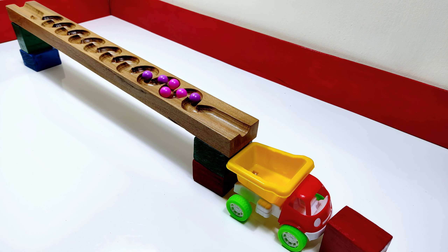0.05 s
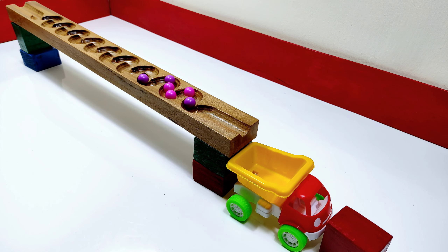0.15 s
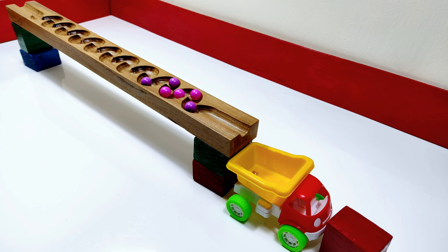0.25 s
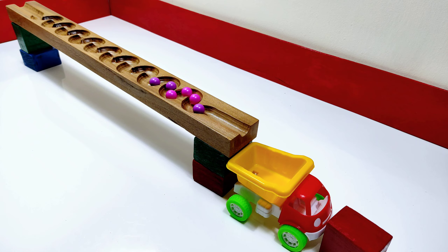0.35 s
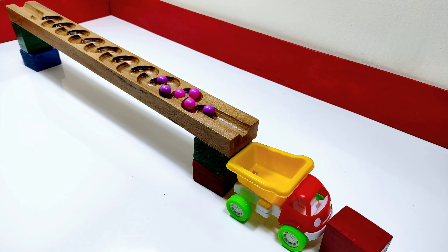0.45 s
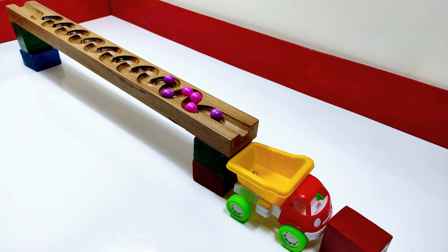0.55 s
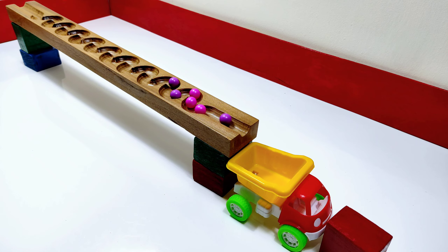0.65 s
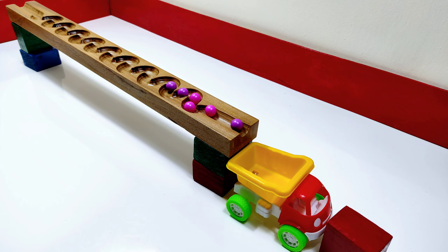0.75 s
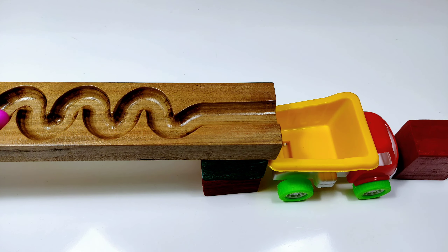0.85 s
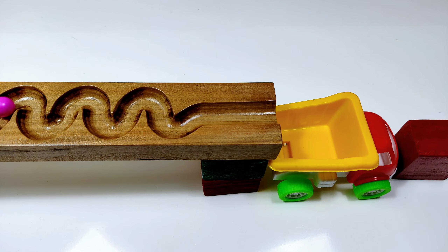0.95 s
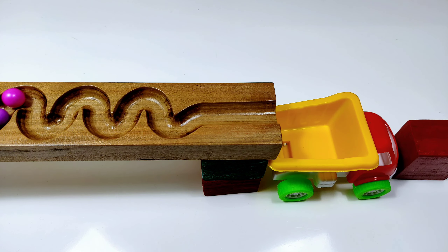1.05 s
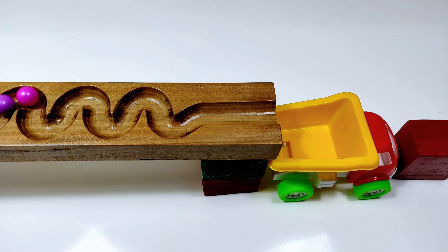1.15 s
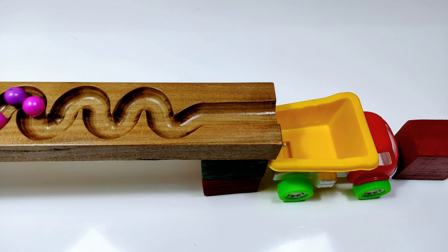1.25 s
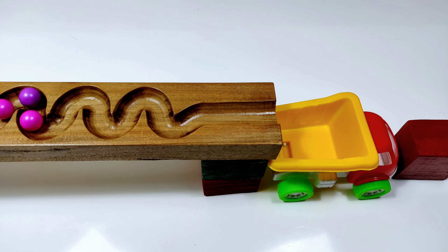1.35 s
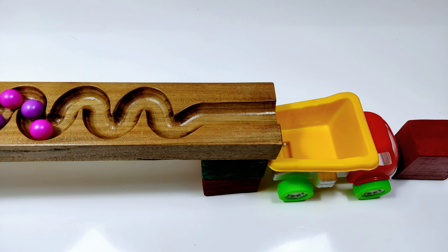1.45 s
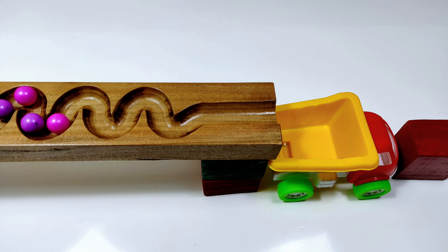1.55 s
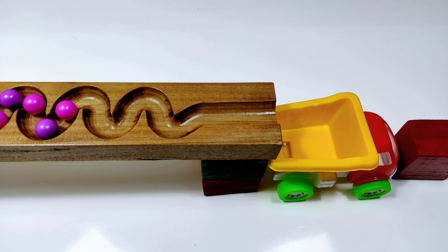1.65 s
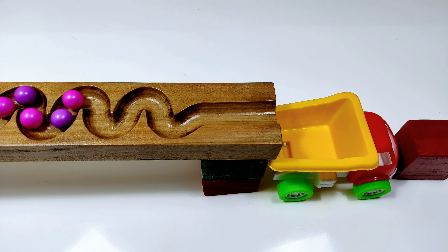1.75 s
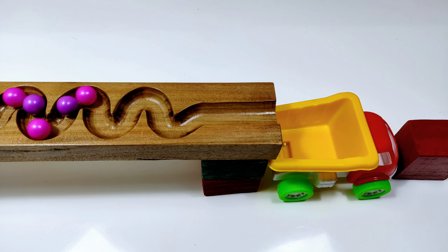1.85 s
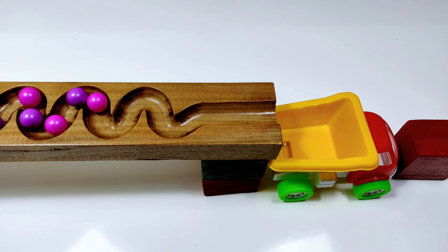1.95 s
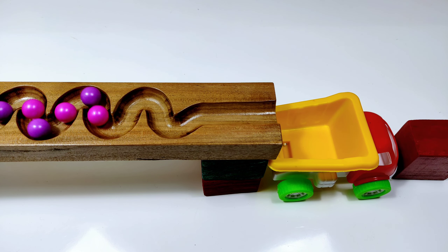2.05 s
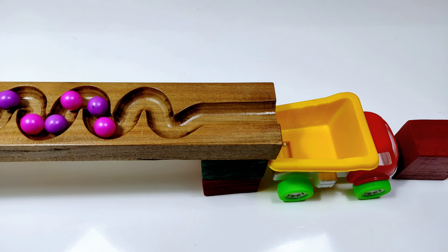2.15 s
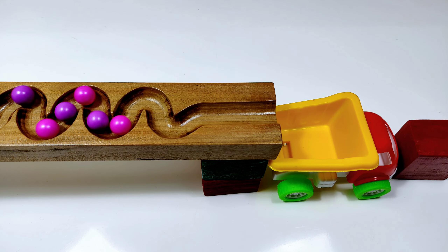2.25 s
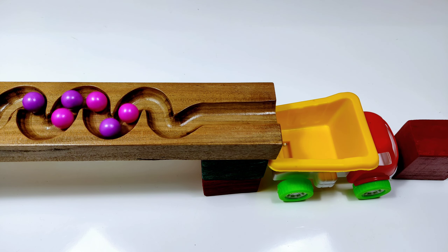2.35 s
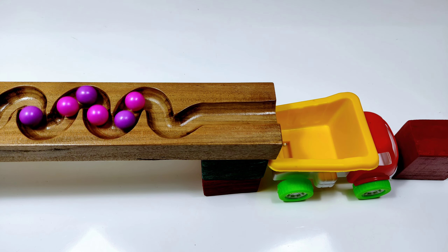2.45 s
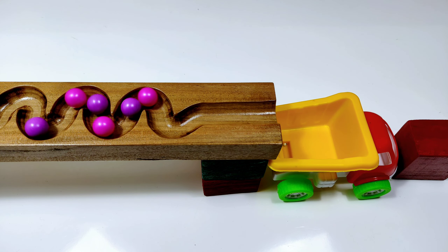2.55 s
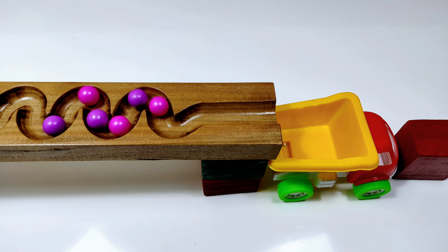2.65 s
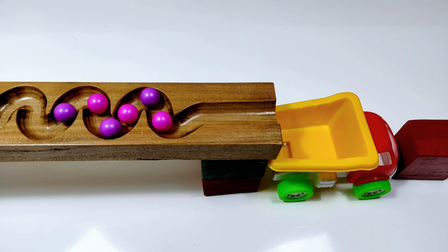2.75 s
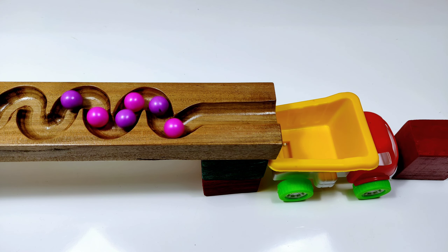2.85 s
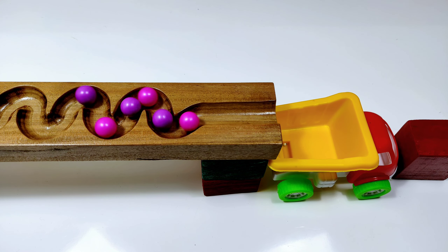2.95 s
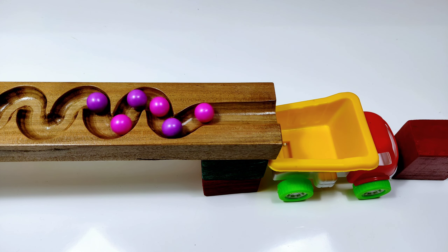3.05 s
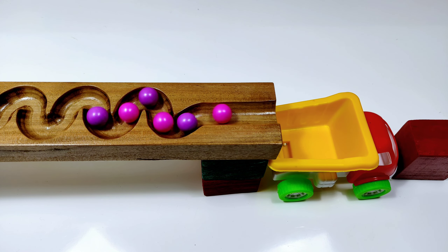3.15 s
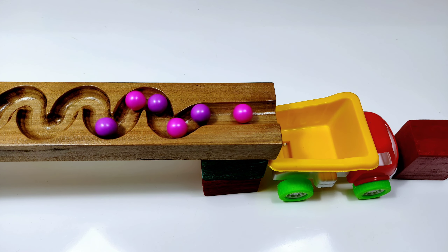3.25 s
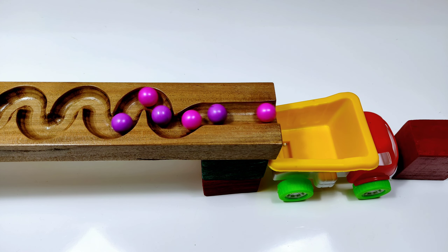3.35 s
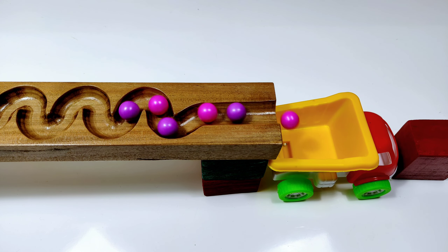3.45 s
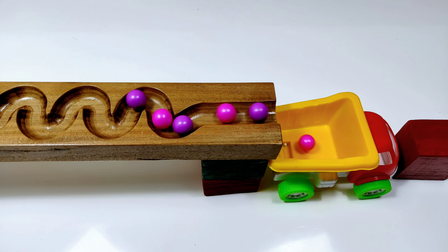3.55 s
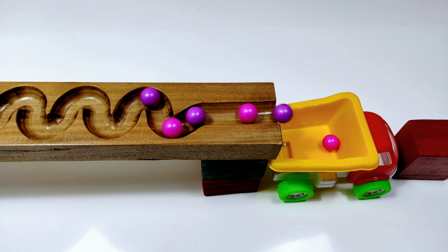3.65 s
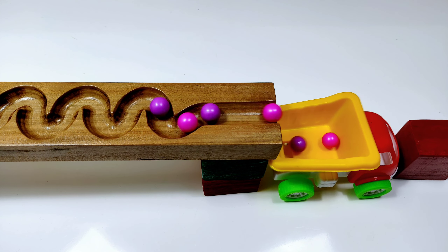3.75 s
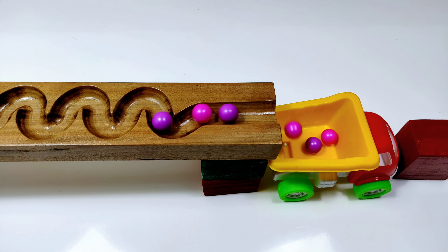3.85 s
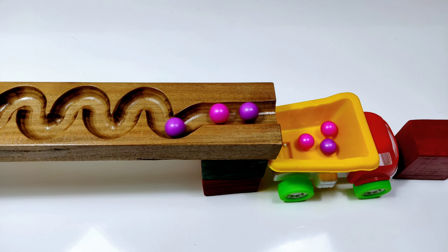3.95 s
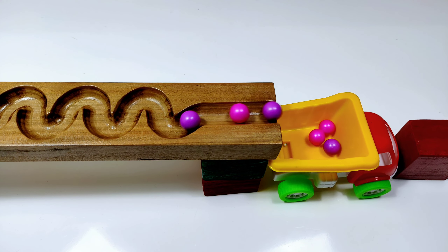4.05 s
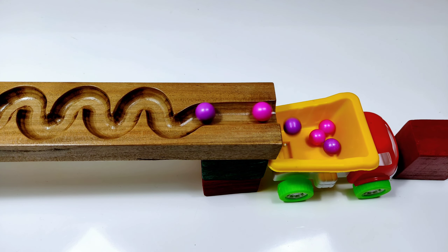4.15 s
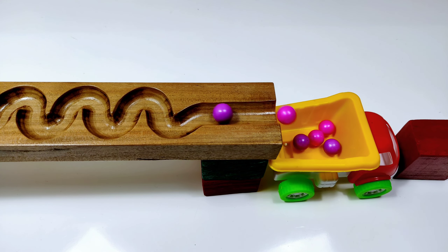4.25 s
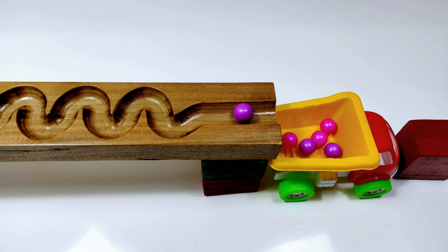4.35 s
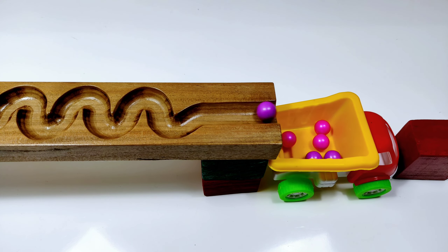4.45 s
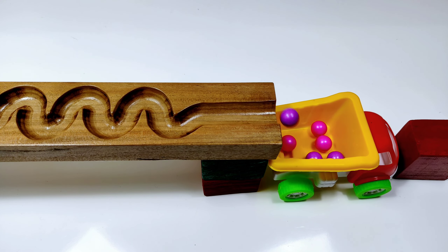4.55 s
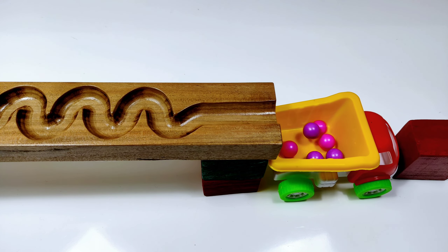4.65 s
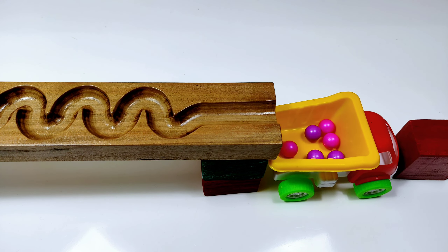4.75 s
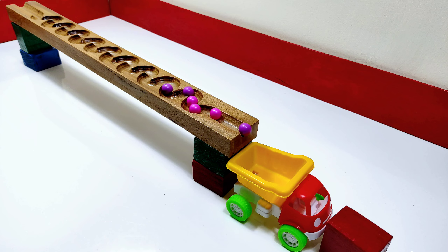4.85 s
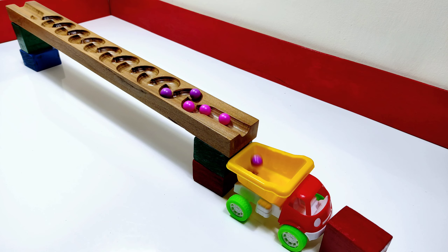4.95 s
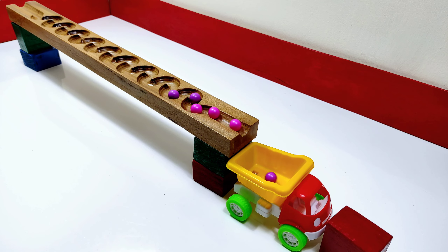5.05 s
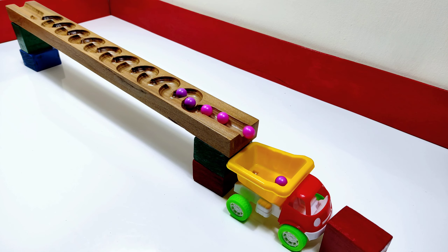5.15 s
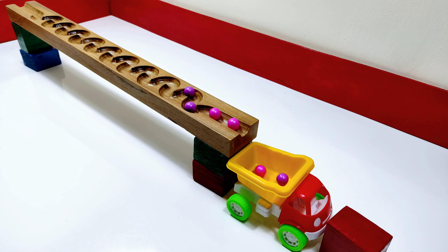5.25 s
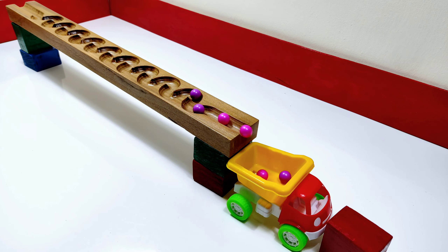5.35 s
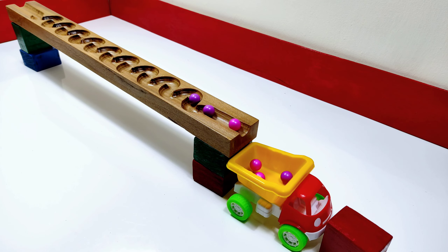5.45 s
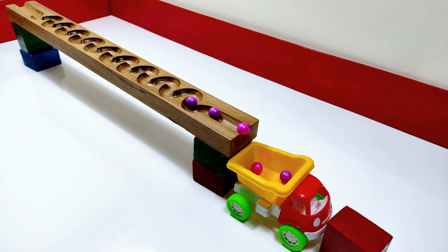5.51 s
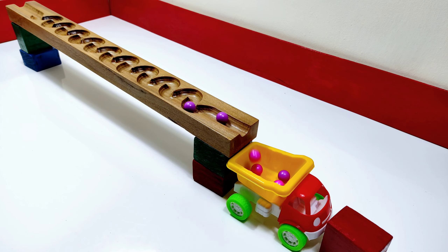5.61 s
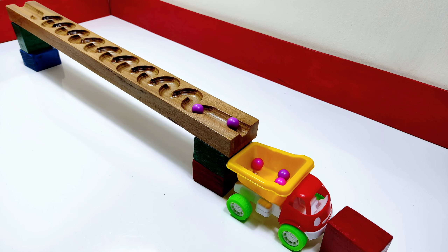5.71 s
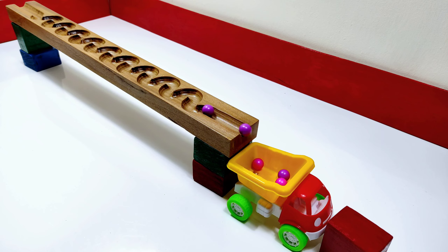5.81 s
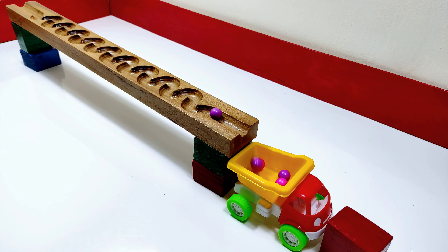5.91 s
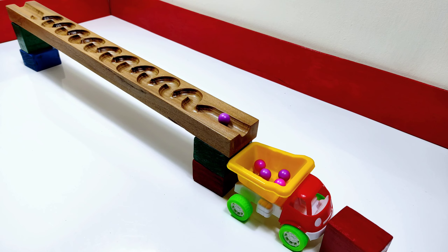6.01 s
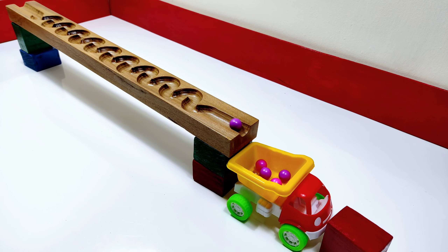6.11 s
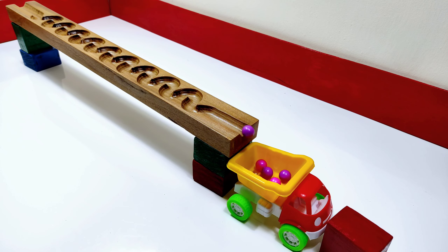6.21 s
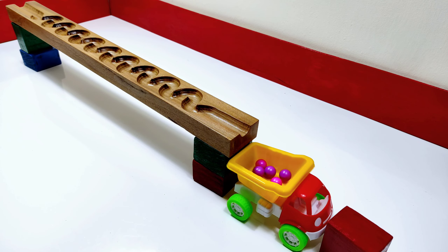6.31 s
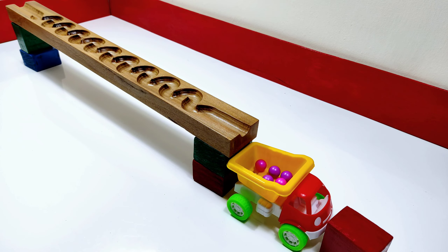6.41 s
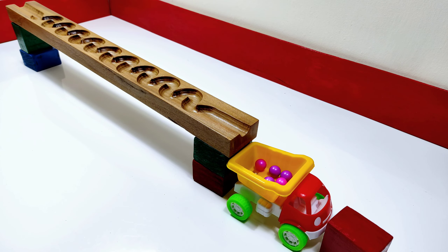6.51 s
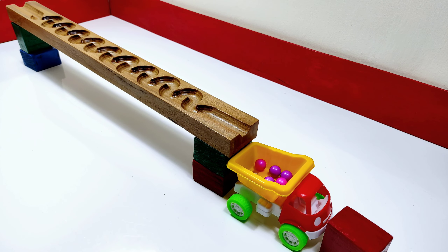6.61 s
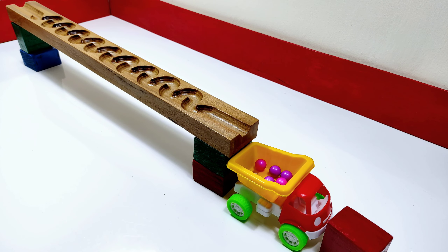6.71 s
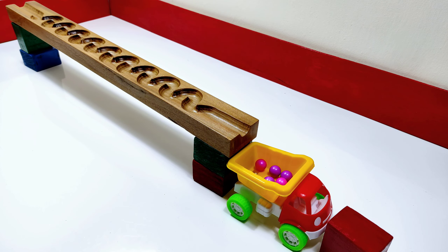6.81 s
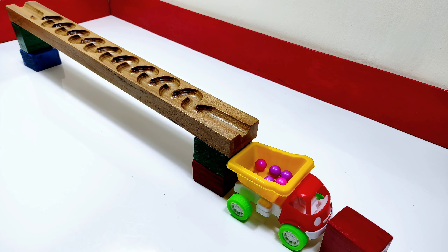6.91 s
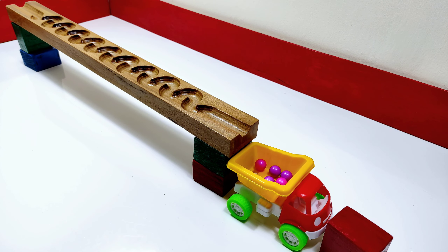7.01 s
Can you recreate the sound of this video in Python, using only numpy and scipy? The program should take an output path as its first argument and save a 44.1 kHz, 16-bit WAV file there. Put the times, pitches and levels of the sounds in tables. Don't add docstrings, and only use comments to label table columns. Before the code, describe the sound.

Glass marbles rumble softly along a wooden track with faint knocks, then crack loudly one after another into a hollow plastic toy truck bed.

```python
import sys
import numpy as np
from scipy import signal
from scipy.fft import rfft, irfft
from scipy.io import wavfile
from scipy.ndimage import uniform_filter1d

SR = 44100
rng = np.random.default_rng(int(sys.argv[2]) if len(sys.argv) > 2 else 0)


def boost_factor(decibels):
    exponent = np.asarray(decibels, float) / 20
    return 10 ** exponent


def to_wav(sig):
    pcm = np.clip(np.atleast_2d(sig), -1, 1) * 32767
    pcm = np.round(pcm).astype(np.int16)
    wavfile.write(sys.argv[1], SR, pcm.T)


N = 312007
TIME = np.arange(N) / SR
BAND_EDGES_HZ = 40 * 2 ** np.arange(0, 9, .5)

# [t/s, level/dB, bounce after/s, bounce loss/dB, bed thump against bounce/dB]
LANDINGS = [(3.536, -11.5, 0.057, 13.5, 9.5), (3.768, -9, 0.046, 22, -16), (3.91, -9.5, 0.045, 23, -3),
            (4.212, -9, 0.059, 20, 6), (4.339, -10, 0.057, 2, 0.5), (4.62, -13, 0.044, 14, 4.5),
            (4.994, -11.5, 0.046, 14.5, -3), (5.267, -9.5, 0.055, 13.5, 4), (5.468, -10, .031, 3, 7.5),
            (5.656, -10, 0.042, 11.5, 6.5), (5.957, -8.5, 0.044, 17.5, 15), (6.337, -5.5, 0.059, 14, 9.5)]
# [t/s, glass level/dB, bed against glass/dB]
JOSTLES = [(2.412, -50, -15), (2.587, -55.5, -25), (2.955, -56.5, -11), (3.628, -35, 8), (3.644, -47, 16.5),
           (3.679, -37, 17), (3.708, -36.5, -6), (3.857, -34.5, 14), (3.876, -44, 12), (3.966, -31.5, 16),
           (3.990, -21, 9.5), (4.035, -41.5, 18.5), (4.066, -33.5, -31), (4.262, -30, 15), (4.307, -34, 9),
           (4.361, -16, 0.5), (4.384, -25, 13), (4.434, -23, 11.5), (4.462, -25.5, 8), (4.505, -47, 20.5),
           (4.559, -37, 12.5), (4.568, -53.5, 15), (4.668, -22.5, -0.5), (4.701, -29, 7.5),
           (4.712, -21.5, 9), (4.748, -26.5, 10), (5.143, -37.5, 10), (5.168, -44, 11.5), (5.572, -32, 13),
           (5.666, -34, 14), (5.716, -31, 12), (5.734, -32.5, 13), (5.76, -54.5, 15.5), (5.814, -36, 9),
           (5.838, -36, 2.5), (6.024, -22, 3.5), (6.812, -64, 8.5), (4.05, -48, 15), (4.073, -37.5, 5.5),
           (4.638, -31, 9), (4.756, -27, 7.5), (4.779, -38.5, 5), (5.074, -43, 9.5), (5.354, -33.5, 9),
           (5.387, -43, 11.5), (5.597, -42.5, 9.5), (5.869, -48.5, 9.5), (6.030, -32, 12),
           (6.054, -32.5, 5), (6.239, -65.5, 3)]
# [f/Hz, level/dB, t60/s]
BED = [(104.7, -5, 0.21), (170.7, -2.5, 0.27), (213.6, -16.5, 0.47), (249, -2, 0.042), (331, -6, 0.033),
       (520, -14.5, 0.031), (636, -27.5, 0.48), (1005, 0, 0.035), (1070, 5, 0.019), (1358, 2, 0.0098),
       (1197, -5, 0.02), (1300, 16, 0.0031), (1433, 3.5, 0.0043), (1610, -2.5, 0.0046)]
# [f/Hz, level/dB, t60/s]
WALLS = [(2110, 18, 0.0033), (2276, -6.5, 0.079), (2632, -1, 0.014), (2640, 2, 0.0086), (3850, 1, 0.017),
         (4320, -24, 0.0037)]
# [f/Hz, level/dB, t60/s]
GLASS = [(4700, -8, .003), (5300, -4, .003), (5900, -3, .003), (6900, -5, .003), (7600, -1, .004),
         (8400, -1, .004), (9200, -4, .003), (11500, -11, .0015), (13000, -15, .0015), (14500, -21, .0015)]
SPOTS = [(3.5, 1.5, -1.5, 7.5, -11), (-0.5, 0, -2.5, 4.5, -4), (0, 2, -3, 5, 3),
         (-4.5, -0.5, -10.5, 7.5, -14.5), (1.5, 6.5, -0.5, 1, -3), (10.5, 1, -4, 3, 16),
         (0.5, 4.5, -1.5, 4, -5), (-4.5, 2.5, 0, -0.5, -10), (1.5, -0.5, 4.5, -2, -3.5),
         (2.5, -2.5, 1, -2.5, 5.5), (0, 1.5, 2, 2.5, 0), (-3.5, 0, 2, 0, -6)]
SPOT_HZ, SPOT_SHARPNESS = (1100, 2500, 4200, 5700, 14000), (2.5, 1.5, 2.5, 3, 1.5)
# [f/Hz, width/Hz, level from afar/dB, level close/dB]
TRACK = [(111, 14, -10, -4), (184, 13.2, 1, -2), (267, 18, -5.5, -6), (308.3, 20, -5.5, -8),
         (391.4, 22, -2.5, -3.5), (433, 32, -1.5, -0.5), (510, 45, -4, -5), (558, 36, -5.5, -5.5),
         (650, 37, -10.5, -8.5), (760, 90, -13, -10), (842, 50, -10.5, -8), (904, 30, -1, -4.5),
         (1100, 200, -12.5, -15.5), (1275, 90, -6, -11.5), (1480, 250, -13.5, -21.5), (2020, 27, -16, -9),
         (2024, 55, -4, 2), (2220, 110, -6.5, -5), (2427, 70, -8, -10.5), (2707, 74, -12.5, -10.5),
         (2766, 110, -8, -3.5), (2890, 43, -9.5, -2.5), (3150, 150, -21, -17), (3691, 55, -23.5, -8.5),
         (3740, 65, -15.5, -15.5), (4050, 40, -25, -22.5), (4690, 90, -14, -9), (5880, 120, -28, -10.5)]
# [t/s, peak level/dB, brightness/dB]
WALL_KNOCKS = [(0.867, -35.5, 7.5), (0.9, -38.5, 7), (1.07, -42, 1), (1.088, -35, 6.5), (1.181, -37, -4),
               (1.297, -36.5, 6.5), (1.395, -44.5, 2), (1.429, -42, 5), (1.49, -40, 4), (1.548, -39, 2),
               (1.63, -38.5, -3), (1.739, -42.5, 13.5), (1.803, -35, 5.5), (1.85, -41, -27),
               (1.909, -41.5, 7), (2.006, -39.5, 0), (2.141, -37.5, 1), (2.18, -48.5, 15),
               (2.359, -42.5, 0), (2.49, -41, -7), (2.647, -46, -19), (2.692, -39.5, -2), (2.799, -33, 5),
               (2.86, -39, -2), (3.031, -37, 3), (3.202, -38.5, 3), (3.241, -38.5, 5), (3.290, -34, -1),
               (3.404, -36, 3), (3.472, -42.5, 9.5)]
# [t/s, peak level/dB]
MORE_KNOCKS = [(0.026, -44.5), (0.09, -45.5), (0.163, -46), (0.195, -41), (0.386, -49.5), (0.454, -41.5),
               (0.571, -46.5), (0.74, -44), (1.014, -44), (1.245, -52), (1.414, -38), (1.813, -38.5),
               (2.076, -50.5), (2.156, -46), (2.314, -51), (2.532, -40.5), (2.591, -49), (2.906, -41.5),
               (3.082, -37), (3.21, -39.5), (0.99, -53), (1.263, -71), (1.524, -41.5), (1.557, -47),
               (2.218, -44), (2.614, -44), (2.766, -46), (2.992, -55), (3.392, -59), (4.178, -42),
               (4.191, -38), (4.876, -44), (4.898, -72), (4.92, -91.5), (4.96, -57)]
# [t/s, level/dB]
PRESSURE = [(0.0, -47.5), (0.07, -49.5), (0.21, -47.5), (0.4, -50.5), (0.5, -45), (0.79, -49.5), (1.3, -49),
            (1.7, -46.5), (3.1, -46), (3.3, -48.5), (3.5, -46.5)]
# [f/Hz, t60/s]
ROOM_T60 = [(100, 0.13), (300, 0.45), (1000, 0.29), (3000, 0.27), (8000, 0.3), (14000, 0.22)]
# [f/Hz, level/dB]
ROOM_COLOUR = [(200, 5.5), (500, 6.5), (780, 3.5), (1150, 8), (3000, 11), (5000, 2.5), (8000, 1),
               (14000, 17)]
# [f/Hz, level per Hz/dB]
HISS = [(150, -36.5), (400, 4.5), (1000, 2.5), (4300, -3), (5600, -8.5), (7500, 19.5), (9500, -9),
        (15000, -65)]
# [t/s, level/dB]
HANDLING = [
    (0, -51.5),
    (.8, -56.5),
    (.85, -57),
    (3.5, -59),
    (4.85, -52),
    (6.3, -56.5),
    (7.07, -43.5),
]
# [f/Hz, likeness from 0 to 1]
LIKENESS = [(60, 0.27), (180, 0.86), (550, 0.65), (1650, 0.16), (4970, 0.36), (15000, 0.052)]
# [f/Hz, left minus right/dB]
PORTS = [(40, 4), (200, 6), (700, 5), (1300, 2.5), (2400, 2.5), (4400, -3.5), (8000, -2), (14000, 11.5)]
# [f/Hz, level/dB]
MIC_COLOUR = [(3500, -1), (4600, -4.5), (5600, -0.5), (7600, 3.5), (9000, 0.5)]
# [from t/s, to t/s, level/dB]
CUTS = [
    (.8085, .8165, -16),
    (4.862, 4.867, -18),
]
CLOSE = (TIME > CUTS[0][0]) & (TIME < CUTS[1][0])


def drops():
    s, thump_db, wall_db, crack_db = blows()
    direct_db = 6.5 * (np.arange(len(s)) >= len(LANDINGS))
    light = crack_db < -16
    wall_db = wall_db - 30 * (s < LANDINGS[0][0])
    thump = strikes(s + 0.00029, thump_db - 5.5, light, direct_db, BED,
                    spread_db=3, detune=0.021, chatter_s=0.005054, chatter_db=-9, count=4)
    walls = strikes(s + 0.00018, wall_db - 7, light, direct_db, WALLS,
                    spread_db=3, detune=0.044, chatter_s=0.0042, chatter_db=-1.5, count=8)
    shared, left, right = [strikes(s, crack_db + 1, light, direct_db, GLASS, spread_db=3.5, detune=0.037,
                                   chatter_s=0.0042, chatter_db=-26.5, count=14) for path in range(3)]
    crack = 0.17 * shared + 0.72 * np.array([left, right])
    wall_gain, crack_gain = either(-3.5)[:, None, None], either(4)[:, None, None]
    return thump + wall_gain * walls + crack_gain * crack


def blows():
    s, level_db, after_s, loss_db, rebound_db = np.transpose(LANDINGS)
    bounce_db = level_db - loss_db
    jostle_s, glass_db, bed_db = np.transpose(JOSTLES)
    thump_db = level_db + 6.5 - 3.5 * (s > CUTS[1][0])
    jostle_wall_db = glass_db + 0.36 * bed_db - 2.5
    times = np.r_[s, s + after_s, jostle_s]
    bed = np.r_[thump_db, bounce_db + rebound_db, glass_db + bed_db]
    wall = np.r_[level_db - 4.5, bounce_db + 0.5, jostle_wall_db]
    return times, bed, wall, np.r_[level_db, bounce_db, glass_db]


def strikes(times, levels_db, light, direct_db, modes, spread_db, detune, chatter_s, chatter_db, count):
    stretch_light = 1.15
    hz, mode_db, t60 = np.transpose(modes)[:, :, None]
    age = np.arange(round((t60.max() + stretch_light * chatter_s) * SR)) / SR
    whole = hz[:, 0] < 400
    alternate = (-1) ** np.arange(len(hz))[:, None]
    out = np.zeros((5, N + SR))
    for k, (s, level_db) in enumerate(zip(times, levels_db)):
        size, tune, sign = rng.standard_normal((3, len(modes), 1))
        lag, gain = rng.random((2, count))
        pitch = hz * (1 + detune * tune * (hz > 400))
        signs = np.where((hz > 1700) & (hz < 4500), np.sign(sign), alternate)
        fading = boost_factor(mode_db + spread_db * size - 60 * age / t60)
        rings = signs * fading * np.sin(2 * np.pi * pitch * age)
        if light[k]:
            rings = rings / (1 + (hz / 9730) ** 4)
        stretch, taps_db, first = (stretch_light, -2, .65) if light[k] else (1, chatter_db, 1)
        tap_size = boost_factor(taps_db) * (2 * gain - 1) * (1 - lag / 2)
        taps = np.bincount((stretch * chatter_s * lag * SR).astype(int), tap_size)
        taps[0] = first
        chatter = signal.fftconvolve(rings[~whole].sum(axis=0), taps)[:len(age)]
        blow = chatter + rings[whole].sum(axis=0)
        blow /= np.sqrt(np.mean(blow[:round(.006 * SR)] ** 2))
        if k < 2 * len(SPOTS):
            blow = spot_colour(blow, SPOTS[k % len(SPOTS)])
        start = round(s * SR)
        out[k % 4, start:][:len(age)] += boost_factor(level_db) * blow
        out[4, start:][:len(age)] += boost_factor(level_db + direct_db[k]) * blow
    return out[:, :N]


def spot_colour(blow, gains_db):
    for hz, sharp, db in zip(SPOT_HZ, SPOT_SHARPNESS, gains_db):
        w, a = 2 * np.pi * hz / SR, boost_factor(db / 2)
        k = np.sin(w) / (2 * sharp)
        turn = -2 * np.cos(w)
        blow = signal.lfilter([1 + k * a, turn, 1 - k * a], [1 + k / a, turn, 1 - k / a], blow)
    return blow


def skitter():
    s, level_db = np.transpose(LANDINGS)[:2]
    age = TIME - s[:, None] - .008
    level = boost_factor(level_db[:, None] - 60 * np.clip(age, 0, 1) / 0.39)
    fade = np.where(age > 0, level, 0).sum(axis=0)
    happens = rng.random(N) < 160 / SR
    contacts = happens * boost_factor(4 * np.minimum(rng.exponential(1, N), 4)) * fade
    bed = sum(boost_factor(db) * ring(contacts * rng.standard_normal(N), hz, t60)
              for hz, db, t60 in BED[7:] + WALLS[1:])
    glass = sum(boost_factor(db) * ring(contacts * rng.standard_normal((2, N)), hz, t60)
                for hz, db, t60 in GLASS[1:7])
    return boost_factor(-28.5) * bed + boost_factor(-19) * glass


def track():
    rumble_db, grain_db = rolling()
    s, knock_db, bright_db = knocks()
    bump_size = boost_factor(3.5 * np.minimum(rng.exponential(1, N), 5))
    bumps = (rng.random(N) < 1500 / SR) * bump_size * rng.choice([-1, 1], N)
    touch = np.arange(5)
    jitter = 1 + .12 * rng.standard_normal((len(s), 5)).clip(-2, 2)
    at = ((s[:, None] + .0112 * touch * jitter) * SR).astype(int).ravel()
    touch_db = np.where(touch == 0, -4, -8 * (touch - 1))
    chance = rng.standard_normal((len(s), len(TRACK), 5))
    rumble, grain, knock = np.zeros((3, N))
    for k, (hz, width_hz, far_db, close_db) in enumerate(TRACK):
        upper = hz > 1700
        t60 = np.log(1000) / (np.pi * width_hz)
        seen = boost_factor(np.where(CLOSE, close_db, far_db))
        rolled = (-1) ** k * seen * np.sqrt(width_hz) * rms_one(ring(bumps, hz, t60))
        if upper:
            grain += rolled
        else:
            rumble += rolled
        hard_db = bright_db * (hz > 3300) - 7 * (hz < 1700) - 6 * (hz < 350) + 1.35 * (1900 < hz < 2100)
        family = round(hz / 950) if upper else k
        sign = 1 if upper else (-1) ** k
        size_db = (knock_db + hard_db)[:, None] + touch_db + 2.5 * chance[:, family] + chance[:, k]
        force = np.bincount(at, sign * boost_factor(size_db).ravel(), N)
        force = uniform_filter1d(force, size=4)
        knock += boost_factor(np.where(CLOSE, -2.5, 3)) * seen * ring(force, hz, 0.87 * t60)
    tick_db = (knock_db + bright_db)[:, None] + touch_db - 9
    knock += ring(np.bincount(at, boost_factor(tick_db).ravel(), N), 5500, 0.00036)
    return boost_factor(rumble_db - 2.5) * rms_one(rumble) + boost_factor(grain_db - 23) * rms_one(grain) + knock


def rolling():
    pressure_db, = in_time(PRESSURE)
    gone = np.searchsorted(np.transpose(LANDINGS)[0] - 0.043, TIME)
    left = np.where(TIME < CUTS[1][0], 6, 12) - gone
    fullness = uniform_filter1d(np.log10(np.maximum(left, .01) / 6), size=2000)
    rumble_db = pressure_db + 6.5 * fullness
    return rumble_db, rumble_db + np.where(CLOSE, -14, 14)


def knocks():
    return np.transpose(WALL_KNOCKS + [(s, db, -0.5) for s, db in MORE_KNOCKS])


def room(x):
    age = np.arange(round(.6 * SR)) / SR
    tail = stereo_bands(len(age), lambda hz: boost_factor(at_hz(ROOM_COLOUR, hz) - 60 * age / at_hz(ROOM_T60, hz)))
    tail *= np.clip(age / 0.003, 0, 1)
    return signal.fftconvolve(np.atleast_2d(x), tail, axes=1)[:, :N]


def background():
    rumble_db, = in_time(HANDLING)
    hiss = rms_one(stereo_bands(N, lambda hz: boost_factor(at_hz(HISS, hz))))
    common, own = rng.standard_normal(N), rng.standard_normal((2, N))
    low = butter(common + 0.74 * own, 2, [18, 110], "band")
    return boost_factor(-62.5) * hiss + boost_factor(rumble_db - 3.5) * rms_one(low)


def stereo_bands(size, gain):
    out, white = 0, rng.standard_normal((2, 2, size))
    for k, (low, high) in enumerate(zip(BAND_EDGES_HZ, BAND_EDGES_HZ[1:])):
        mid, side = butter(white[k % 2], 2, [low, high], "band")
        hz = np.sqrt(low * high)
        alike = np.clip(at_hz(LIKENESS, hz), 0, 1)
        pair = np.sqrt(1 + alike) * mid + np.sqrt(1 - alike) * side * [[1], [-1]]
        out = out + gain(hz) * pair
    return out


def ring(force, hz, t60):
    r, w = boost_factor(-60 / (t60 * SR)), 2 * np.pi * hz / SR
    return signal.lfilter([0, np.sin(w)], [1, -2 * r * np.cos(w), r * r], force + 1e-18)


def butter(x, order, hz, kind):
    return signal.sosfilt(signal.butter(order, hz, kind, fs=SR, output="sos"), x)


def in_time(rows):
    s, *columns = np.transpose(rows)
    return [np.interp(TIME, s, c) for c in columns]


def at_hz(points, hz):
    known_hz, value = np.transpose(points)
    return np.interp(np.log(hz), np.log(known_hz), value)


def rms_one(x):
    return x / np.sqrt(np.mean(x ** 2) + 1e-20)


def either(left_db):
    return boost_factor(left_db / 2 * np.array([1, -1]))


def scene():
    falls, wood = drops(), track()
    wood_pair = either(-1.65)[:, None] * np.array([np.roll(wood, 11), wood])
    areas, straight = falls[:, :4], falls[:, 4]
    body = butter(areas.sum(axis=1), 4, [85, 328], "band")
    sent = butter(areas.mean(axis=0), 2, 328, "high")
    sent += .6 * butter(sent, 2, 3000, "high")
    sent -= .55 * butter(sent, 1, [480, 900], "band")
    falls_wet = boost_factor(-38.5) * sum(room(area) for area in sent)
    direct = boost_factor(-3) * butter(straight, 8, 1010, "high")
    truck = direct + skitter() + boost_factor(-13.5) * body + falls_wet
    return truck + wood_pair + boost_factor(-42) * room(wood) + background()


def gain_control(x, knee_db, squeeze, recover_db):
    over_db = np.maximum(20 * np.log10(np.abs(x).max(axis=0) + 1e-9) - knee_db, 0)
    climb_db = recover_db * TIME
    held_db = np.maximum.accumulate(squeeze * over_db + climb_db) - climb_db
    late_db = np.interp(TIME - .0056, TIME, held_db)
    return x * boost_factor(-uniform_filter1d(late_db, size=40))


def roll_off(x):
    return signal.sosfilt(signal.butter(12, 16670, fs=SR, output="sos"), x)


def record(dry):
    hz = np.maximum(np.arange(N // 2 + 1) * SR / N, 1)
    balance_db = at_hz(PORTS, hz) / 2 * np.array([[1], [-1]])
    x = irfft(rfft(dry) * boost_factor(at_hz(MIC_COLOUR, hz) + balance_db), N)
    x = gain_control(x, knee_db=-11.5, squeeze=0.46, recover_db=57)
    x = x / (1 + np.abs(x / .76) ** 4) ** .25
    edge_hz = 8810
    below = signal.sosfilt(signal.cheby1(8, .2, edge_hz, fs=SR, output="sos"), x)
    x = below + boost_factor(-12.5) * butter(x, 4, edge_hz, "high")
    x = x / (1 + np.abs(x / .88) ** 8) ** .125
    for start, end, gap_db in CUTS:
        fade_s = [start - .001, start, end, end + .005]
        x = x * boost_factor(np.interp(TIME, fade_s, [0, gap_db, gap_db, 0]))
    x = signal.sosfilt(signal.cheby2(8, 40, 16600, fs=SR, output="sos"), x)
    return roll_off(x)


dry = scene()
out = record(dry)
to_wav(out)
```